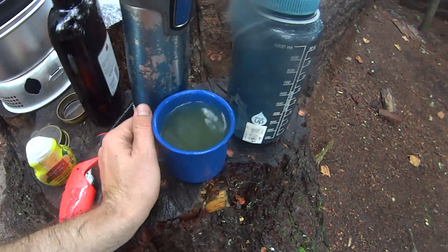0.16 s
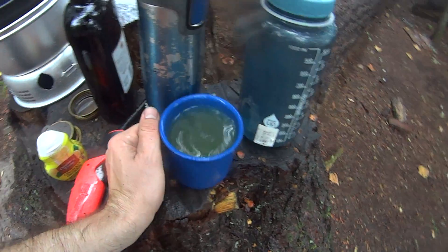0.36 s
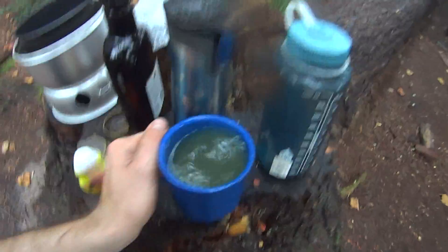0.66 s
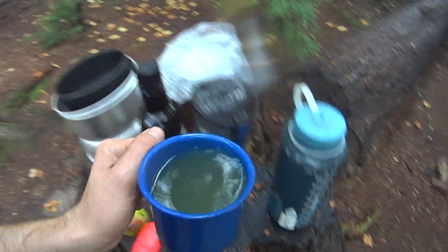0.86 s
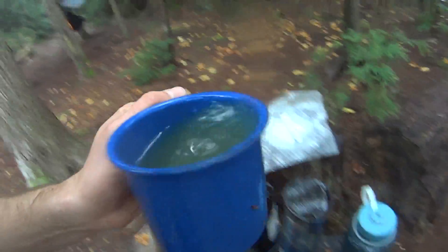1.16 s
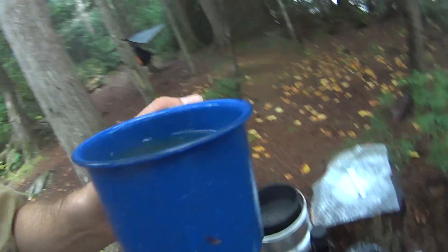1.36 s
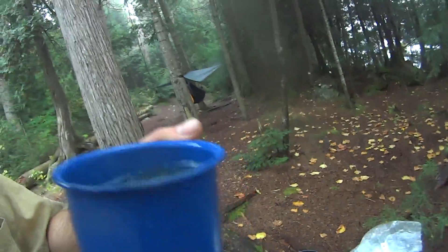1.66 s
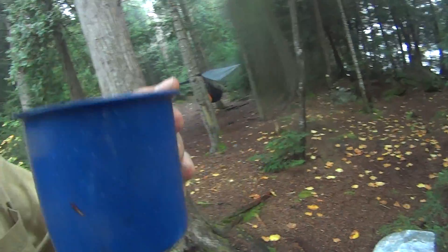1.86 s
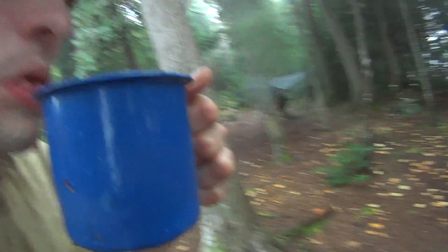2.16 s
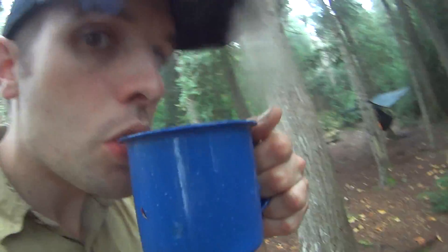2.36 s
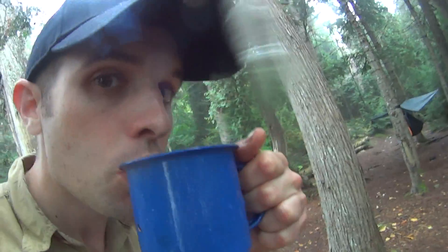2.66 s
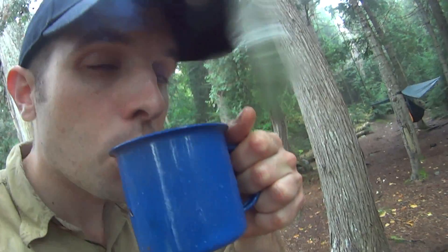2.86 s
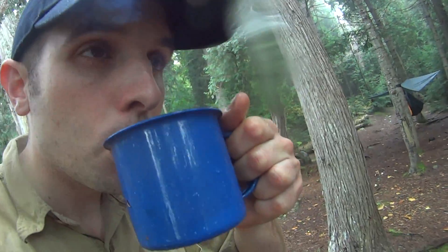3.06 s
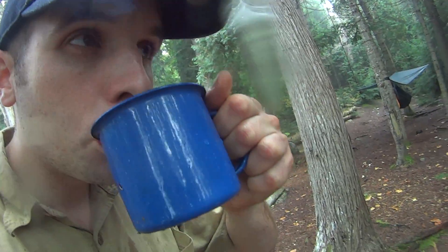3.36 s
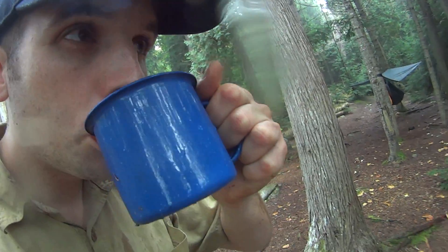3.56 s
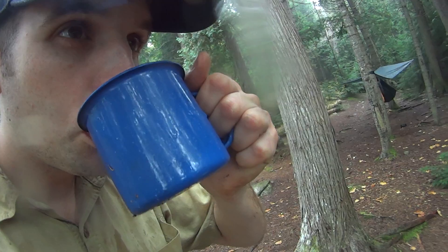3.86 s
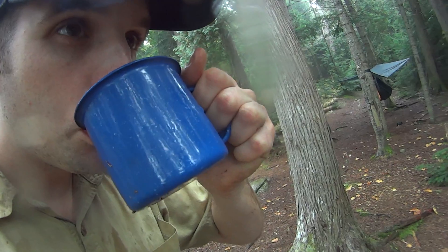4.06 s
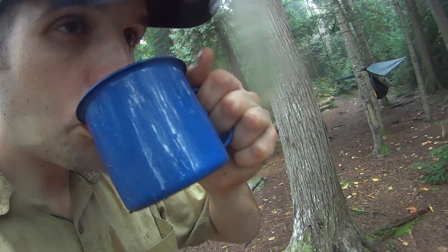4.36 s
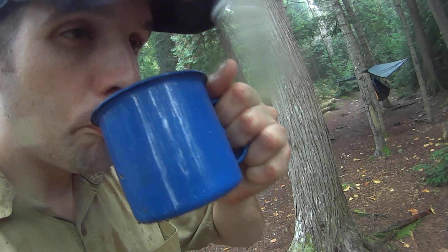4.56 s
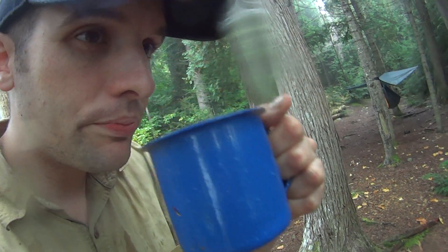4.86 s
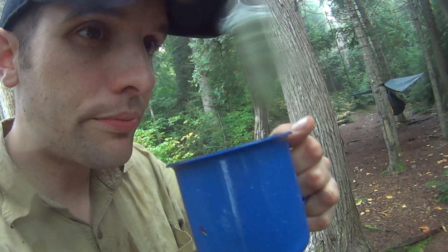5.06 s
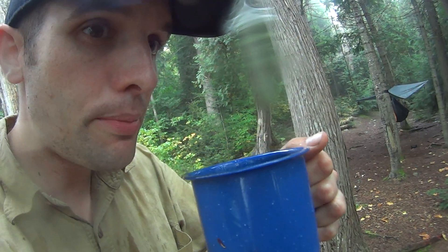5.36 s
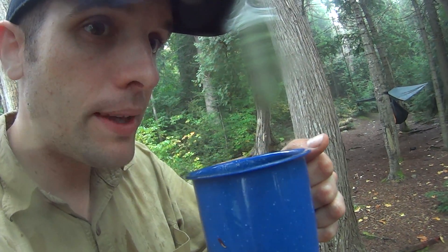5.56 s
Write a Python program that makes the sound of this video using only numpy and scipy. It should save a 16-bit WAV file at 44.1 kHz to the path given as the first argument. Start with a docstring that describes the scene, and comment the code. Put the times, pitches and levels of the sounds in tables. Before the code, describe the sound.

Close hand-held stereo microphone under dripping trees: crisp ticks, tiny splashes and damped plops scattered over an even, band-limited rain hiss. Early on a mug clunks and drags roughly off a stump with almost no ring. Slight cloth rubs and weak low wind puffs accompany the movement during the first couple of seconds; the remainder is rain and uneven drips, dry and without echo.

```python
"""Forest camp in steady rain: single drips from the trees land close to a small hand-held camera.
Each near drip sums a noise splash and spray, a damped thud, a tick and a low push; strays fall further off.
An enamel mug is knocked and dragged off a stump: decaying sines and noise through its modes.
Rain is coloured noise plus a patter of damped sines; a sleeve rustles in gliding noise bands.
Low lumpy noise is air on the microphone while the camera swings."""
import sys
import numpy as np
from scipy import signal
from scipy.io import wavfile
from scipy.ndimage import uniform_filter1d

SR = 44100
rng = np.random.default_rng(int(sys.argv[2]) if len(sys.argv) > 2 else 0)


def pcm_store(signal):
    """Save signal as 16-bit PCM."""
    levels = np.round(np.clip(np.atleast_2d(signal), -1, 1) * 32767)
    wavfile.write(sys.argv[1], SR, levels.astype(np.int16).T)


N = 251193


def gain_of(db):
    """Amplitude ratio of a level in dB."""
    return 10 ** (np.asarray(db) / 20)


def evened(x):
    """Scales to unit RMS."""
    return x / np.sqrt(np.mean(x ** 2) + 1e-20)


def peaked(x, db):
    """Scales to a peak level, shared by both channels."""
    return gain_of(db) * x / abs(x).max()


def read(points, hz):
    """Interpolates a spectrum over log frequency."""
    f, value = np.transpose(points)
    return np.interp(np.log(hz + 1), np.log(f + 1), value)


def curve(rows, column=1, outside=None):
    """Interpolates a table column over the whole scene."""
    rows = np.array(rows)
    return np.interp(np.arange(N) / SR, rows[:, 0], rows[:, column], left=outside, right=outside)


def panned(x, db):
    """Stereo with a left-minus-right level difference."""
    return np.array([x * gain_of(db / 2), x * gain_of(-db / 2)])


def add(mix, s, sound):
    """Mixes in a sound at time s, cut at the end of the scene."""
    part = mix[:, round(s * SR):][:, :sound.shape[1]]
    part += sound[:, :part.shape[1]]


def coloured(x, colour):
    """Shapes x by a spectrum with the phase of a causal filter."""
    level_db = np.maximum(read(colour, abs(np.fft.fftfreq(8192, 1 / SR))), -100)
    log_gain = np.log(gain_of(level_db))
    minimum_phase = np.exp(np.conj(signal.hilbert(log_gain)))
    taps = np.fft.ifft(minimum_phase).real[:4096]
    return signal.oaconvolve(x, taps)[:len(x)]


def ring(x, hz, width):
    """One resonance; complex input keeps one-sided output."""
    r = np.exp(-np.pi * width / SR)
    y = signal.lfilter([1 - r], [1, -r * np.exp(2j * np.pi * hz / SR)], x)
    return y if np.iscomplexobj(x) else 2 * y.real


def steep(x, hz, width):
    """The same resonance twice, for dark skirts."""
    return ring(ring(x, hz, width), hz, width)


def above(x, hz):
    """Attenuates what lies below hz."""
    return signal.sosfilt(signal.butter(3, hz, "high", fs=SR, output="sos"), x)


def below(x, hz):
    """Attenuates what lies above hz."""
    return signal.sosfilt(signal.butter(4, hz, fs=SR, output="sos"), x)


# splash resonances of the microphone port: f/Hz, width/Hz, relative level/dB
PORT_MODES = [(3600, 1300, -8), (5350, 900, 0), (7100, 700, -11)]
SPRAY_HZ, SPRAY_WIDTH_HZ = 10150, 2700


def drip(thud_db, thud_hz, t60, tick_db, tick_hz, splash_db, spray_db, push_db, pan_db, grit):
    """A millisecond of splash and spray comes first, then a damped thud, a tick and a low push."""
    t = np.arange(grit.shape[1]) / SR
    burst = grit * np.exp(-t / 0.0012) * (1 - np.exp(-t / 0.00043))
    snap = burst + 1.37 * (np.arange(len(t)) == 26)  # hardest instant of the impact
    splash = sum(gain_of(db) * ring(snap, hz, width) for hz, width, db in PORT_MODES)
    splash = above(below(splash, 6300), 3100)
    spray = steep(burst, SPRAY_HZ, SPRAY_WIDTH_HZ)

    late = np.maximum(t - np.array([[.00064], [.0006]]), 0)  # left port hears the body a little later
    rise = 1 - np.exp(-late / 0.00024)
    cycles = thud_hz * (late + 0.00011 * (1 - np.exp(-late / 0.0009)))  # pitch sinks as the drop spreads
    thud = np.sin(2 * np.pi * cycles) * gain_of(-60 * late / t60) * rise
    tail = grit * gain_of(-60 * late / (3.8 * t60)) * (1 - np.exp(-late / 0.00057))  # rough and slower
    thud = above(thud + .8 * steep(tail, thud_hz, 800), .6 * thud_hz)
    tick = np.sin(2 * np.pi * tick_hz * late) * gain_of(-60 * late / 0.0089) * rise
    tick = above(tick, 0.39 * tick_hz)
    push = above(np.sin(2 * np.pi * 380 * late) * np.exp(-late / 0.00093) * rise, 186)

    both = peaked(thud, thud_db) + peaked(tick, tick_db) + peaked(push, push_db)
    both = both + peaked(splash, splash_db) + peaked(spray, spray_db)
    return both * gain_of([[pan_db / 2], [-pan_db / 2]])


# near drips, peaks before panning: t/s, thud level/dB, thud f/Hz, tick level/dB, tick f/Hz,
# splash level/dB, spray level/dB, low push level/dB, left-right/dB
NEAR_DRIPS = [(0.0725, -67, 1740, -34, 2200, -44, -43, -77, 1),
              (0.116, -60, 1440, -30, 2250, -27.5, -38, -65, 1),
              (0.1575, -66, 1380, -33, 2450, -45, -36.5, -77, 2),
              (0.2626, -48, 1580, -46, 2440, -50, -39, -77, 0),
              (0.3265, -67, 1690, -59, 2310, -41, -38, -77, -3),
              (0.6695, -46, 770, -59, 2540, -53, -52, -68, 10),
              (0.7012, -57, 1500, -32, 2570, -38, -50, -64.5, 7),
              (0.7058, -67, 1500, -59, 2400, -36, -23, -77, 4),
              (0.7311, -45, 1590, -42, 2250, -36, -42, -66, 1.8),
              (0.7443, -43, 960, -40, 2400, -50, -43, -82, 4),
              (0.8321, -55, 1470, -38, 2220, -48, -44, -59, -6),
              (0.885, -39, 790, -38, 2210, -39, -40, -51, 2),
              (0.914, -43, 1390, -32, 2160, -40, -40, -55, 3),
              (0.9487, -43, 1570, -57, 2080, -32, -32.5, -54, 1),
              (1.0494, -50, 1460, -32, 2340, -27.5, -39, -77, 0),
              (1.104, -29.5, 1150, -33.5, 1980, -47, -42, -54, -5),
              (1.205, -30.5, 1480, -36, 2030, -26.5, -50, -50, -4),
              (1.3, -53, 1690, -41, 2310, -34, -40, -77, 0),
              (1.3584, -55, 1180, -37, 2670, -29.5, -60, -77, -1),
              (1.6832, -23.5, 1310, -33, 2050, -31, -44, -43, 5),
              (1.692, -20.5, 1290, -43, 1970, -29.5, -39, -37, 3),
              (1.851, -67, 1510, -38, 2600, -26, -38, -75, -1),
              (1.9144, -43.5, 1280, -35, 2320, -33, -42, -77, -4),
              (2.0062, -40.5, 1290, -59, 2510, -53, -57, -59, 0),
              (2.0588, -39, 1560, -59, 2470, -52, -70, -52, 2.6),
              (2.123, -46, 1460, -44, 2230, -30.5, -39, -77, 0),
              (2.1976, -35, 1500, -37, 2370, -40, -59, -52, 5),
              (2.247, -36, 1450, -32, 2370, -24.5, -30, -73, -1),
              (2.3294, -45, 1130, -37, 2450, -32, -52, -63, -5),
              (2.3445, -53, 1180, -41, 2400, -35, -45, -49, -1.7),
              (2.5935, -48, 1380, -55, 2270, -31, -52, -57, -2),
              (2.6104, -38, 1270, -35, 2190, -26, -39, -56, -2),
              (2.996, -35.5, 1290, -28.5, 2100, -28.5, -41, -70, -3),
              (3.059, -26.5, 1550, -29, 2030, -32, -51, -60, -5),
              (3.145, -13.5, 1500, -12.5, 2080, -12.5, -50, -43, 0.5),
              (3.2385, -47, 1500, -37, 2300, -32, -55, -77, -1.7),
              (3.2483, -51, 1600, -29.5, 2340, -47, -52, -77, -0.6),
              (3.4042, -51, 1390, -33, 2340, -31.5, -42, -77, -5),
              (3.6351, -34.5, 1650, -23, 2330, -19.5, -29, -56, -3.3),
              (3.6434, -58, 1580, -25, 2120, -27, -45, -63, -1),
              (3.7261, -53, 1720, -23.5, 2270, -25, -39, -55, -3),
              (3.8083, -30.5, 1560, -37, 2050, -38, -55, -64, 0),
              (3.936, -67, 1530, -34, 2300, -30.5, -44, -72, -2.8),
              (3.9611, -38, 1650, -43, 2280, -37, -37, -66, -0.7),
              (4.0263, -56, 1450, -31, 2310, -42, -62, -77, -3.1),
              (4.0488, -67, 1530, -32.5, 2410, -34, -59, -77, -1),
              (4.158, -40, 1450, -34, 2100, -34.5, -57, -62, -12),
              (4.2269, -28.5, 1490, -41, 2500, -30.5, -55, -55, 3),
              (4.306, -37, 1580, -42, 2260, -43, -70, -65, 2.3),
              (4.3428, -27.5, 1250, -30.5, 2220, -23.5, -44, -55, 3.5),
              (4.4673, -31, 1450, -32.5, 2240, -35, -55, -64, -2),
              (4.5122, -67, 1390, -46, 2390, -32, -65, -77, -1),
              (4.7455, -34.5, 1520, -32.5, 2070, -39, -55, -77, -2.7),
              (4.8522, -44, 1200, -36, 2700, -23, -44, -77, 0),
              (4.897, -37, 1310, -47, 2430, -44, -53, -47.5, 1),
              (4.9486, -56, 1570, -59, 2840, -26.5, -43, -79, -4),
              (5.057, -61, 1680, -20, 2680, -26, -45, -77, -2),
              (5.1152, -38, 1420, -45, 2180, -33, -57, -49, -3),
              (5.123, -38.5, 1290, -52, 2650, -49, -58, -75, -14),
              (5.158, -67, 1480, -47, 2440, -26.5, -42, -71, -1),
              (5.1769, -59, 1530, -50, 2570, -34, -35, -64, 0),
              (5.2317, -40.5, 1420, -51, 2310, -44, -56, -70, -1.4),
              (5.4512, -36, 1370, -59, 2220, -37, -56, -67, 9),
              (5.5148, -67, 1390, -30, 2400, -30, -40, -77, 1),
              (5.5537, -18, 1600, -29, 2170, -18.5, -37, -48, 0.5),
              (5.5804, -67, 1390, -40, 2480, -31, -43, -59, 1),
              (5.6085, -38, 1620, -46, 2280, -45, -62, -72, -1.9),
              (5.6818, -23.5, 1240, -25.5, 2120, -26, -51, -64, 5.5)]
# thud cycles to fall 60 dB at a -30 dB peak; change per dB of peak
THUD_CYCLES, CYCLES_PER_DB = 11.5, -.17
SPLASH_SPREAD = 0.51  # noise of opposite sign at the two ports, relative to the shared noise


def near_drips():
    """Close drops; a heavier thud decays in fewer of its own cycles."""
    out = np.zeros((2, N))
    noises = rng.standard_normal((len(NEAR_DRIPS), 2, 2000))
    for (s, thud_db, thud_hz, *row), noise in zip(NEAR_DRIPS, noises):
        t60 = (THUD_CYCLES + CYCLES_PER_DB * (thud_db + 30)) / thud_hz
        grit = noise[:1] + SPLASH_SPREAD * noise[1] * [[1], [-1]]
        add(out, s, drip(thud_db, thud_hz, t60, *row, grit))
    return out


STRAYS_PER_S, STRAY_LEAST_DB, STRAY_SPREAD_DB = 24, -42.5, 3.


def strays():
    """Small drips a few steps away at random moments, each with its own mix of thud, tick, splash and spray."""
    out = np.zeros((2, N))
    draws = rng.random((round(STRAYS_PER_S * N / SR), 8))
    for u, noise in zip(draws, rng.standard_normal((len(draws), 2, 1000))):
        size_db = STRAY_LEAST_DB - STRAY_SPREAD_DB * np.log(1 - .95 * u[1])
        thud_db, tick_db = size_db - 13 - 20 * u[2], size_db - 14 * u[3]
        splash_db, spray_db = size_db - 10 * u[4], size_db - 1.5 - 16 * u[5]
        thud_hz, tick_hz = 1100 + 600 * u[6], 2150 + 400 * u[6]
        pan_db = 8 * (u[7] - .6)
        grit = noise[:1] + 0.37 * noise[1] * [[1], [-1]]
        sound = drip(thud_db, thud_hz, 0.04, tick_db, tick_hz, splash_db, spray_db, -85, pan_db, grit)
        add(out, u[0] * N / SR, sound)
    return out


# modes of the mug on its stump: f/Hz, relative level/dB, nominal t60/s
MUG_MODES = [(368, -19, 0.23), (537, -12.5, 0.025), (770, -2.5, 0.032), (960, -1, 0.028),
             (1310, 2.5, 0.041), (1500, -1, 0.019), (1840, -1.5, 0.029), (2400, -4, 0.034),
             (2850, -5.5, 0.025), (3850, -7.5, 0.012), (4280, -8, 0.025), (5100, -9, 0.018),
             (5420, -8.5, 0.016), (6700, -19, 0.018)]
# blows on the mug: t/s, peak level/dB, brightness/dB per octave, grit click peak level/dB
MUG_KNOCKS = [(0.448, -29, 5., -27), (0.4519, -14, 1, -25), (0.512, -18.5, 10, -16)]
# mug dragged over bark: t/s, RMS level/dB
MUG_DRAG = [(.452, -60), (.457, -41), (.47, -40.5), (.495, -42), (.509, -34), (.515, -32.5), (.53, -28),
            (.569, -28), (.582, -44), (.592, -43)]


def mug():
    """Knocks and a rough drag shake the same modes; each port hears its own mix of them."""
    roughness_db = 1.9 * evened(uniform_filter1d(rng.standard_normal(N), 60))
    grains = rng.standard_normal((2, N)) * gain_of(roughness_db)
    grains = grains + 0.38 * grains[::-1] * [[0], [1]]  # the right port shares some of the left
    drag = sum(gain_of(db) * steep(grains, hz, 10.6 / t60) for hz, db, t60 in MUG_MODES)
    out = drag / drag.std(axis=1)[:, None] * gain_of(curve(MUG_DRAG, outside=-120))

    t = np.arange(9000) / SR
    phases = rng.uniform(-0.9, 1.0, (len(MUG_KNOCKS), len(MUG_MODES), 2, 1))
    for (s, peak_db, tilt_db, click_db), phase in zip(MUG_KNOCKS, phases):
        blow = 0
        for (hz, db, t60), p in zip(MUG_MODES, phase):
            level = gain_of(db + tilt_db * np.log2(hz / 1300))
            # bark damps most of it at once
            decay = gain_of(-60 * t / (0.54 * t60)) + 0.15 * gain_of(-60 * t / t60)
            blow = blow + level * np.sin(2 * np.pi * hz * t + p) * decay
        click = above(rng.standard_normal((2, len(t))) * np.exp(-t / 0.0011), 2500)
        add(out, s, peaked(click, click_db))
        add(out, s, peaked(blow * (1 - np.exp(-t / 0.00042)), peak_db))

    hz, _, t60 = MUG_MODES[0]  # lifted free, the lowest mode rings on
    free = gain_of(-49.0 - 60 * t / t60) * np.sin(2 * np.pi * hz * t) * (1 - np.exp(-t / 0.0029))
    add(out, .575, panned(free, 3.3))
    return out


# sleeve rubs near the microphone: t/s, length/s, RMS level at the loudest point/dB,
# first centre f/Hz, last centre f/Hz, width/Hz
SLEEVE_RUBS = [(1.121, 0.14, -50, 1300, 1150, 900), (2.044, 0.061, -50, 1600, 1560, 300),
               (2.187, 0.11, -46, 1590, 1340, 503), (2.268, .12, -47, 700, 850, 900)]
RUB_PEAK_SHARE, RUB_ENDS_DB = 0.36, -12  # loudest point in the stroke; ends relative to it


def sleeve():
    """Grainy noise in a broad gliding band that swells and fades, different at each port."""
    out = np.zeros((2, N))
    for s, length, peak_db, first_hz, last_hz, width in SLEEVE_RUBS:
        u = np.linspace(0, 1, round(length * SR))
        grains = rng.standard_normal((2, 8000))[:, :len(u)]
        grains = grains * gain_of(12. * uniform_filter1d(rng.standard_normal(8000), 100)[:len(u)])
        centre_hz = first_hz + (last_hz - first_hz) * u
        turn = np.exp(2j * np.pi * np.cumsum(centre_hz) / SR)
        band = (turn * steep(grains / turn + 0j, 0, width)).real  # filter at 0 Hz, shift back up
        swell_db = RUB_ENDS_DB * np.interp(u, [0, RUB_PEAK_SHARE, 1], [1, 0, 1])
        add(out, s, evened(band) * gain_of(peak_db + swell_db))
    return out


def hiss(colour, patchy_db):
    """Noise of a given spectrum with small drifting patches in time and frequency."""
    frames = N // 128 + 5
    patches = uniform_filter1d(rng.standard_normal((frames, 257)).T, 8, 0)
    patches = evened(uniform_filter1d(patches, 12, 1))
    noise = coloured(rng.standard_normal(N + 512), colour)
    z = signal.stft(noise, nperseg=512, noverlap=384)[2][:, :frames]
    z = z * gain_of(patchy_db * patches[:, :z.shape[1]])
    return signal.istft(z, nperseg=512, noverlap=384)[1][:N]


# spectrum of far rain and microphone hiss, centre part: f/Hz, relative level/dB per Hz
CENTRE_COLOUR = [(12, -43), (30, -10.5), (60, -14), (500, -16.5), (870, -17), (1270, -10.5), (1800, -7),
                 (2270, 1.5), (2900, -4), (3700, -8), (5180, -4), (6300, -10), (7300, -11), (8700, -20.5),
                 (9800, -13.5), (11500, -21), (22000, -27)]
PATTER_PER_S, PATTER_SPREAD_DB = 500, 5


def patter():
    """Many small drops on leaves and litter at middle distance, each a few damped cycles; a few are large."""
    size_db = PATTER_SPREAD_DB * np.minimum(rng.exponential(1, N), 4.5)
    size = gain_of(size_db) * (rng.random(N) < PATTER_PER_S / SR)
    kind, t, out = rng.integers(0, 24, N), np.arange(400) / SR, np.zeros((2, N))
    pitches_hz, pans = np.geomspace(900, 10500, 24), rng.uniform(-1, 1, 24)
    for k, (hz, pan) in enumerate(zip(pitches_hz, pans)):
        tap = np.sin(2 * np.pi * hz * t) * np.exp(-t * hz / 1.4) * np.sqrt(hz)
        out += panned(signal.oaconvolve(size * (kind == k), tap)[:N], 14.0 * pan)
    return evened(np.array([coloured(c, CENTRE_COLOUR) for c in out]))


# spectrum of the left-minus-right part: f/Hz, relative level/dB per Hz
SIDE_COLOUR = [(12, -55), (20, -29), (461, -8), (526, -7), (1790, -10), (2330, 0), (2810, -6), (3480, -9.5),
               (5320, -14.5), (7130, -11.5), (8580, -20.5), (10100, -16.5), (11500, -25), (15000, -55),
               (22000, -120)]
# shower as the camera turns: t/s, centre hiss level/dB, left-right/dB
SHOWER_LEVEL = [(0.0, -46.5, 0.5), (0.25, -48, 0), (0.8, -47.5, 0.5), (1.17, -46.5, 1), (1.5, -47.5, 1),
                (2.3, -46.8, 0), (3.0, -47, -0.2), (4.16, -46.5, -0.4), (4.62, -47, -0.3), (5.1, -47, -0.5),
                (5.7, -46.5, -0.5)]
SIDE_DB, PATTER_DB = -6, -10.5  # relative to the centre hiss


def rain():
    """The far shower as centre and side hiss, with the patter on top."""
    centre = evened(hiss(CENTRE_COLOUR, patchy_db=0.85))
    side = gain_of(SIDE_DB) * evened(hiss(SIDE_COLOUR, patchy_db=1.5))
    both = np.array([centre + side, centre - side]) + gain_of(PATTER_DB) * patter()
    return both * panned(gain_of(curve(SHOWER_LEVEL)), curve(SHOWER_LEVEL, column=2))


# rumble spectrum: f/Hz, relative level/dB per Hz
AIR_COLOUR = [(12, -23), (30, 1.5), (60, -0.5), (100, -7), (160, -13), (250, -20), (500, -66)]
# air on the microphone while the camera swings: t/s, level before lumps and puffs/dB
SWING_LEVEL = [(0.0, -72), (.25, -73), (.53, -59), (.8, -71), (1.3, -66), (1.5, -65), (1.65, -72),
               (2.1, -70), (2.4, -63), (2.6, -75), (3.0, -76)]
# sudden puffs of air: t/s, added peak level/dB, length/s
AIR_PUFFS = [(0.728, -63, 0.046), (0.885, -57, 0.043), (1.007, -57, 0.034), (1.166, -54, 0.084),
             (1.283, -56, 0.034), (1.464, -62, 0.07), (2.068, -63, .05), (2.222, -62, 0.093)]
LUMP_DB, LUMP_S = 1, .04


def rumble():
    """Low lumpy air noise with a few puffs, nearly the same in both channels."""
    a, b = (evened(coloured(rng.standard_normal(N), AIR_COLOUR)) for _ in range(2))
    lumps = evened(signal.oaconvolve(rng.standard_normal(N), np.hanning(round(LUMP_S * SR)), "same"))
    t = np.arange(N) / SR
    puffs = sum(gain_of(db) * np.exp(-(2 * (t - s) / length) ** 2) for s, db, length in AIR_PUFFS)
    level = gain_of(curve(SWING_LEVEL, outside=-120) + LUMP_DB * lumps) + puffs
    return level * np.array([a + .15 * b, a - 0.072 * b])


def scene():
    """Sum of all sources."""
    return near_drips() + strays() + mug() + sleeve() + rain() + rumble()


EDGE_HZ = 11120


def record(dry):
    """The band limit of the recorder: a linear-phase low-pass."""
    taps = signal.firwin(401, EDGE_HZ, window=("kaiser", 8), fs=SR)
    return signal.oaconvolve(dry, taps[None], "same")


dry = scene()
out = record(dry)
pcm_store(out)
```